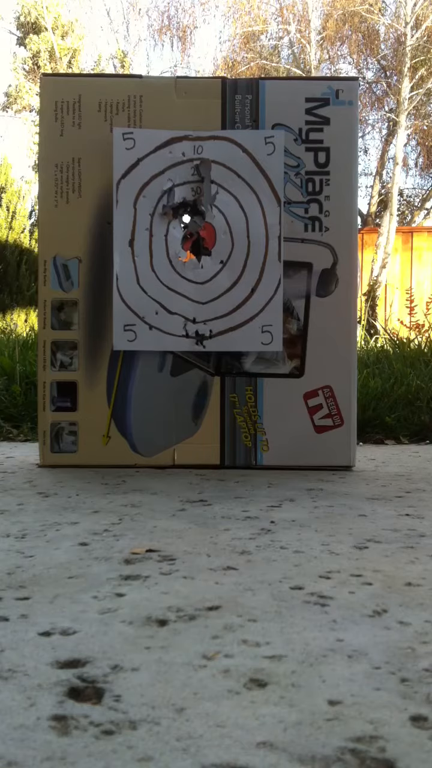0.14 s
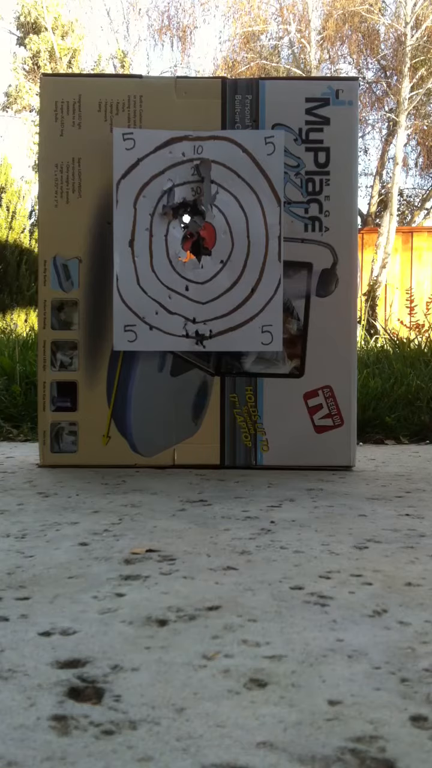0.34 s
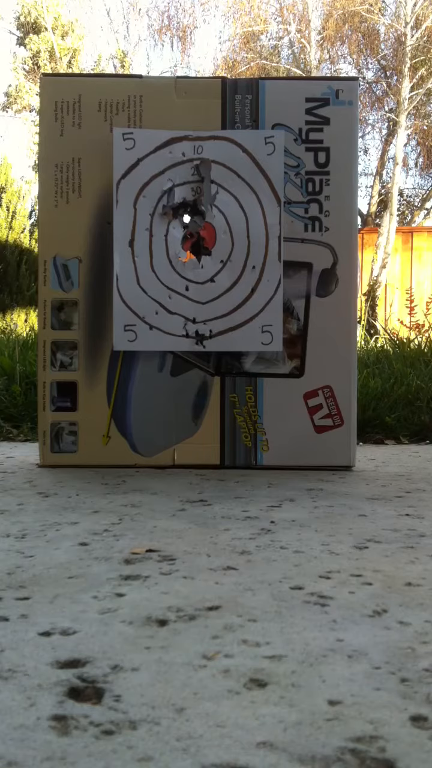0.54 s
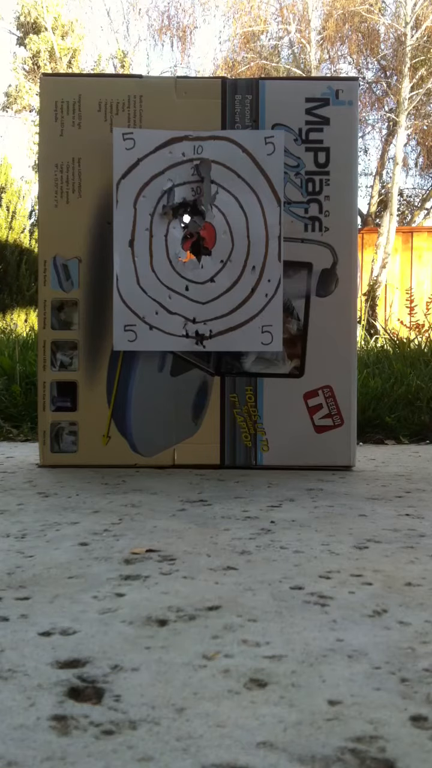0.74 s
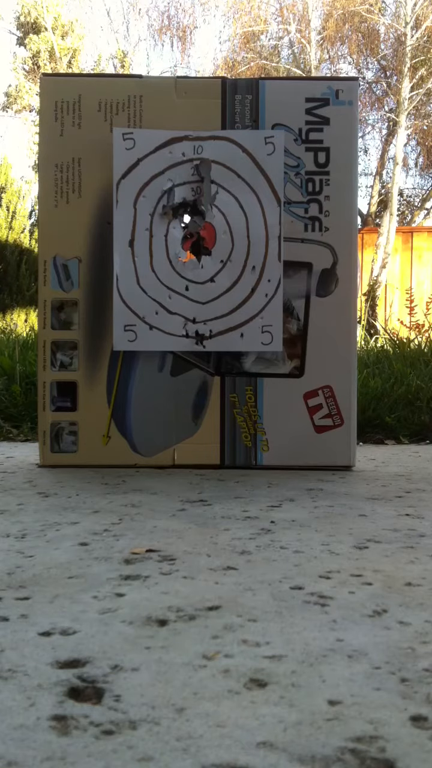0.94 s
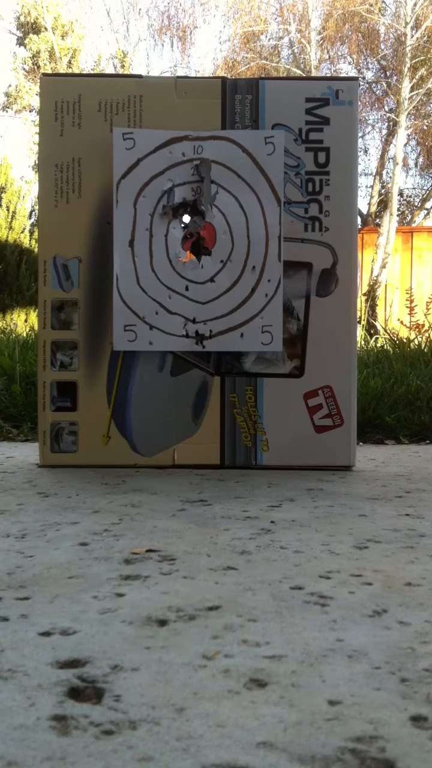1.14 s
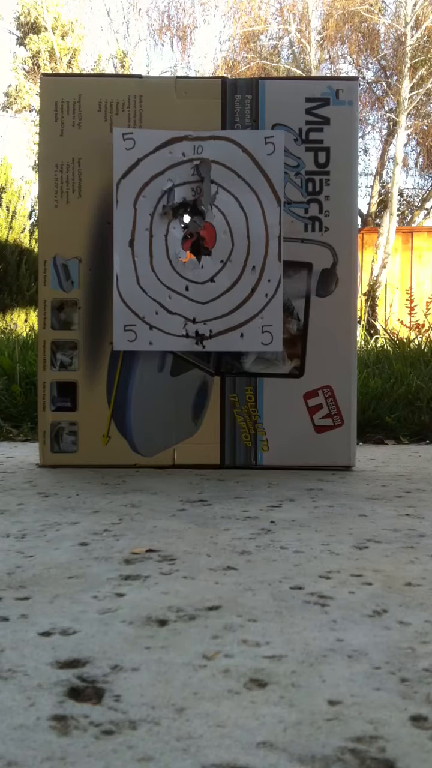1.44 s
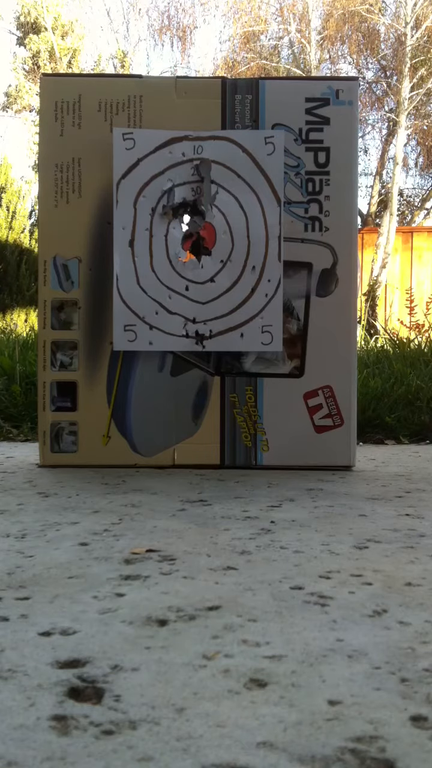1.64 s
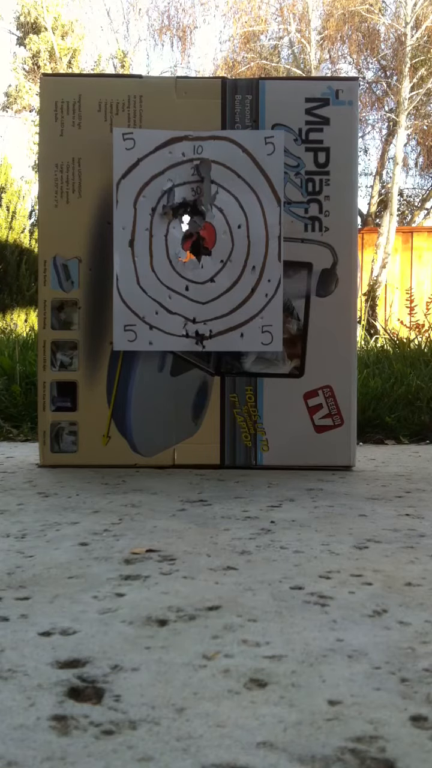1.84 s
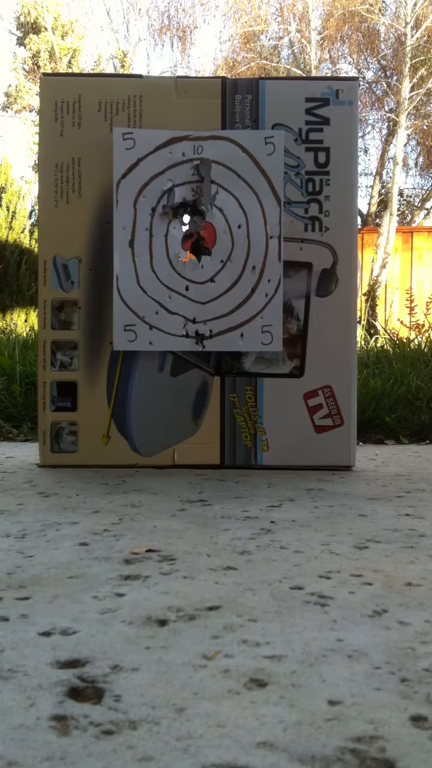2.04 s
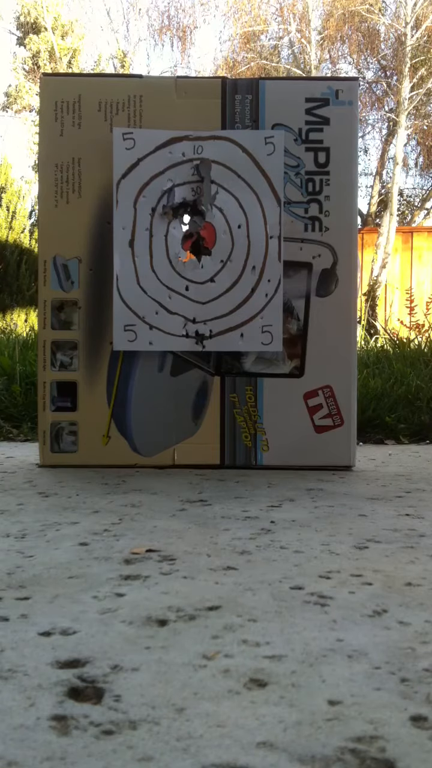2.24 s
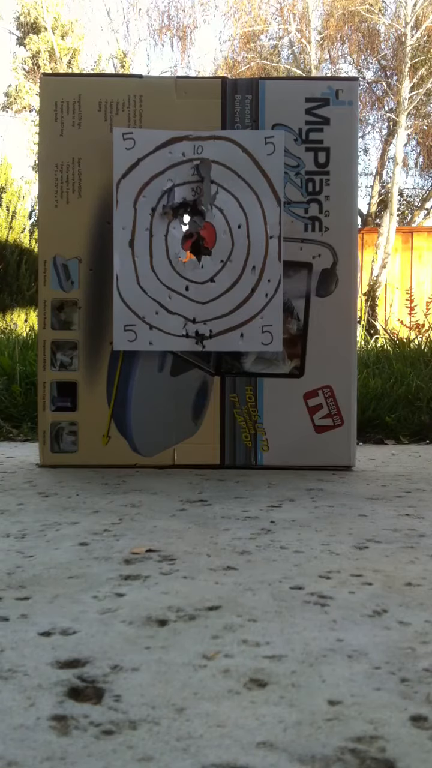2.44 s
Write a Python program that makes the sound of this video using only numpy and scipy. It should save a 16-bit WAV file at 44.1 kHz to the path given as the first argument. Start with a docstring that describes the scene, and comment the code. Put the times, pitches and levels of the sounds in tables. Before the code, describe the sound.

An electric airsoft gun fires one long, steady automatic burst, about twelve shots a second, with motor whine and gear rattle; pellets snap sharply on a cardboard box beside the microphone, then a short bright yard echo fades.

```python
"""In a yard, an electric airsoft gun fires one long automatic burst at a paper target on a cardboard box.
A wavering motor whine and noisy gear rattle run over faint outdoor noise. In each cycle a noise rush leads
to a cluster of metal contacts that set gun modes ringing, with a thump and one echo. About 18 ms later
the pellet cracks on the box beside the microphone: filtered snaps, noise crackle, ringing cardboard modes.
Decaying noise bands give the yard's short bright wash."""
import sys
import numpy as np
from scipy import signal
from scipy.fft import rfft, irfft
from scipy.io import wavfile

SR = 44100
rng = np.random.default_rng(int(sys.argv[2]) if len(sys.argv) > 2 else 0)


def bounce(signal):
    """Save signal as a 16-bit WAV file at the path given by the first command-line argument."""
    frames = np.transpose(np.atleast_2d(signal))
    limited = np.clip(frames, -1, 1)
    pcm = np.round(limited * 32767).astype(np.int16)
    wavfile.write(sys.argv[1], SR, pcm)


N = 112455


def from_db(db):
    """Turn decibels into amplitude gain."""
    return 10 ** (np.asarray(db, float) / 20)


def rms_one(x):
    """Scale a signal to an rms of 1."""
    return x / np.sqrt(np.mean(x ** 2) + 1e-20)


def noise():
    """White noise as long as the scene."""
    return rng.standard_normal(N)


def band(x, low_hz, high_hz):
    """Keep what lies between two frequencies."""
    sos = signal.butter(2, [low_hz, high_hz], "band", fs=SR, output="sos")
    return signal.sosfilt(sos, x)


def clicks(start_s, gains):
    """Place one impulse per event over a vanishingly small floor."""
    out = np.full(N, 1e-18)
    index = np.clip((np.asarray(start_s) * SR).astype(int), 0, N - 1)
    np.add.at(out, index, gains)
    return out


def ring(x, pitch_hz, t60_s):
    """A two-pole resonator: each click sets off a sine that falls 60 dB in t60_s."""
    radius = from_db(-60 / (t60_s * SR))
    angle = 2 * np.pi * pitch_hz / SR
    return signal.lfilter([0, np.sin(angle)], [1, -2 * radius * np.cos(angle), radius ** 2], x)


def power_decay(t60_s):
    """Per-sample factor by which power falls 60 dB in t60_s."""
    return from_db(-120 / (t60_s * SR))


def dying(start_s, level_db, t60_s):
    """Amplitude envelope of overlapping decays, summed as powers."""
    power = clicks(start_s, from_db(2 * level_db))
    return np.sqrt(signal.lfilter([1], [1, -power_decay(t60_s)], power))


def drift(rate_hz):
    """Smoothed random wander of rms 1, after one second of settling."""
    r = np.exp(-2 * np.pi * rate_hz / SR)
    wander = signal.lfilter([1], [1, -2 * r, r * r], rng.standard_normal(N + SR))
    return rms_one(wander[SR:])


# spectrum of the outdoor air: pitch_hz [Hz], level_db [dB per Hz, relative]
YARD_SPECTRUM = [(35, -45), (60, -20), (222, -2.5), (308, -9), (666, -13), (1060, -20.5), (1280, -17.5),
                 (16000, -35.5)]
YARD_DB = -69.5  # rms


def yard():
    """Faint outdoor air: noise shaped to a spectrum on a log-frequency scale."""
    pitch_hz, level_db = np.transpose(YARD_SPECTRUM)
    f = np.arange(N // 2 + 1) * SR / N + 1  # 1 Hz offset avoids log(0)
    shape = from_db(np.interp(np.log(f), np.log(pitch_hz), level_db))
    air = irfft(rfft(noise()) * shape, N)
    return from_db(YARD_DB) * rms_one(air)


# motor start: start_s [s], whine pitch_hz [Hz], whine level_db [dB rms, before flutter]
SPIN_UP = [(0.0, 765, -35.5), (0.014, 937, -40), (0.02, 936, -40), (0.034, 620, -52), (0.048, 637, -37)]
# gear rattle resonances: centre pitch_hz [Hz], width_hz [Hz], level_db [dB rms]
GEARS = [(671, 230, -47.5), (900, 1500, -51.5), (2330, 640, -53.5), (4130, 600, -51.5),
         (5430, 10400, -58.5)]
STEADY_S, WHINE_HZ, WHINE_DB = 0.07, 658, -51  # where the whine settles
WHINE_WAVER, WHINE_FLUTTER_DB = 0.036, 4.5  # rms pitch fraction, rms level
MOTOR_STOP_S, MOTOR_FADE_S = 2.27, 0.052  # the fade is an exponential time constant


def motor():
    """A sine whine that overshoots in pitch at the start, with gear rattle as resonant noise bands."""
    t = np.arange(N) / SR
    start_s, pitch_hz, level_db = np.transpose(list(SPIN_UP) + [(STEADY_S, WHINE_HZ, WHINE_DB)])
    # the waver begins at the last start-up point, before the whine settles
    waver = WHINE_WAVER * drift(24.2) * (t > start_s[-2])
    pitch = np.interp(t, start_s, pitch_hz) * (1 + waver)
    level = from_db(np.interp(t, start_s, level_db) + WHINE_FLUTTER_DB * drift(60))
    whine = np.sqrt(2) * level * np.sin(2 * np.pi * np.cumsum(pitch) / SR)
    gears = 0
    for centre_hz, width_hz, gear_db in GEARS:
        rattle = band(noise(), centre_hz - width_hz / 2, centre_hz + width_hz / 2)
        gears = gears + from_db(gear_db) * rms_one(rattle)
    fade = np.exp(-np.maximum(t - MOTOR_STOP_S, 0) / MOTOR_FADE_S)
    return (whine + gears) * fade


FAVOUR_DB_PER_OCTAVE, FAVOUR_MAX_DB = 6, 2.5  # modes far from the favoured pitch ring less


def struck(start_s, level_db, modes, spread_db, favoured_hz=None):
    """Modal ringing: every blow strikes every mode with a random strength of its own."""
    chance = rng.standard_normal((len(start_s), len(modes)))
    out = 0
    for k, (pitch_hz, mode_db, t60_s) in enumerate(modes):
        loss_db = 0
        if favoured_hz is not None:
            octaves_away = np.abs(np.log2(pitch_hz / favoured_hz))
            loss_db = np.minimum(FAVOUR_DB_PER_OCTAVE * octaves_away, FAVOUR_MAX_DB)
        blows = clicks(start_s, from_db(level_db + mode_db - loss_db + spread_db * chance[:, k]))
        out = out + (-1) ** k * ring(blows, pitch_hz, t60_s)  # neighbouring modes alternate in sign
    return out


THUMP_HZ, THUMP_T60_S, THUMP_SOFT_HZ, THUMP_GAIN_DB = 202.4, 0.017, 700, 12.5


def thump(start_s, level_db):
    """A low thump near 200 Hz: a softened click, randomly flipped, in a heavily damped resonance."""
    click = clicks(start_s, from_db(level_db + THUMP_GAIN_DB) * rng.choice([-1, 1], len(start_s)))
    r = np.exp(-2 * np.pi * THUMP_SOFT_HZ / SR)
    soft_click = signal.lfilter([1 - r], [1, -r], click)
    return ring(soft_click, THUMP_HZ, THUMP_T60_S)


# piston slams: start_s [s], ring_db, thump_db, treble tick_db [dB, before the gains]
SHOTS = [(0.054, -14.5, -33, -14), (0.1542, -16.5, -37, -16), (0.2405, -18, -33, -15),
         (0.3241, -19.5, -32, -19.5), (0.407, -18, -31, -17.5), (0.4892, -17, -28, -13.5),
         (0.5727, -18, -23, -14), (0.6555, -17.5, -41, -16.5), (0.7385, -19, -18, -21),
         (0.822, -17, -27, -21), (0.9057, -17, -20.5, -21.5), (0.989, -16.5, -23, -15.5),
         (1.072, -16, -33, -14.5), (1.1566, -15, -33, -10.5), (1.2401, -15.5, -29, -13.5),
         (1.324, -16, -27.5, -14), (1.408, -18.5, -24.5, -17.5), (1.4905, -18, -24, -15.5),
         (1.574, -18, -27, -14.5), (1.6581, -17, -26, -15), (1.742, -17, -28.5, -12),
         (1.8267, -18, -45, -15.5), (1.9105, -18, -18, -19), (1.9952, -18, -37.5, -18.5),
         (2.0789, -16.5, -22.5, -16.5), (2.163, -16, -27.5, -14.5), (2.2482, -16, -25, -15)]
# ringing modes of the gun body: pitch_hz [Hz], level_db [dB, relative], t60_s [s]
GUN_MODES = [(340, -8, 0.019), (667, -2.5, 0.011), (1567, -3.5, 0.0086), (2330, 2.5, 0.007),
             (2670, -4, 0.013), (3760, -8, 0.0056)]
# treble resonances heard in the tick, the highest probably the microphone's:
# pitch_hz [Hz], level_db [dB, relative], t60_s [s]
TICK_RESONANCES = [(6500, -18, .004), (9480, -2, 0.0013), (13900, 2, 0.002)]
# metal contacts of one slam: lag_s from its stated time [s], ring_db, tick_db [dB, relative]
CONTACTS = [(-.0036, -18, -15.5), (-.0022, -12.5, -21.5), (-.0012, -9.5, -18.5), (-.0004, 2, -1),
            (.0006, -14, -14.5)]
GUN_GAIN_DB, TICK_GAIN_DB = 1.5, 7.5
RUSH_S, RUSH_DB = 0.0032, -9.5  # air and rattle of the travelling piston, relative to the ring level
ECHO_S, ECHO_DB, ECHO_LOW_HZ = 0.0064, -10.5, 900


def piston():
    """A swelling noise rush, a run of contacts that ring and tick, one hard echo and a thump."""
    start_s, ring_db, thump_db, tick_db = np.transpose(SHOTS)
    ramp = np.linspace(.25, 1, int(RUSH_S * SR)) ** 2
    swell = signal.fftconvolve(clicks(start_s - RUSH_S, from_db(ring_db + RUSH_DB)), ramp)[:N]
    rush = swell * rms_one(band(noise(), 410, 5200) + .3 * noise())
    body = struck(start_s, ring_db + GUN_GAIN_DB, GUN_MODES, spread_db=2.0)
    tick = struck(start_s, tick_db + TICK_GAIN_DB, TICK_RESONANCES, spread_db=2.0)
    slam = 0
    for lag_s, body_db, treble_db in CONTACTS:
        contact = from_db(body_db) * body + from_db(treble_db) * tick
        slam = slam + np.roll(contact, int(lag_s * SR))
    echo = from_db(ECHO_DB) * np.roll(band(slam, ECHO_LOW_HZ, 18000), int(ECHO_S * SR))
    return rush + slam + echo + thump(start_s, thump_db)


# pellet strikes: start_s [s], box_db [dB], favoured box_hz [Hz], thump_db [dB],
# crack_db around 2, 5 and 12 kHz [dB], wash_db [dB]; all levels before the gains
HITS = [(0.0732, -30, 509, -38, -16, -32, -18, -31), (0.1737, -18, 565, -27, -16, -37, -21, -33),
        (0.2592, -20, 544, -25, -23, -20, -20.5, -30.5), (0.341, -39, 534, -27.5, -19, -29, -25, -30.5),
        (0.4255, -24, 820, -44, -31, -12.5, -34, -33.5), (0.5079, -21, 640, -23.5, -45, -12.5, -28, -32),
        (0.5912, -24, 686, -37, -22, -17.5, -21, -31.5), (0.6739, -30.5, 569, -25, -43, -11.5, -19, -36),
        (0.7573, -22, 488, -18.5, -42, -29, -14, -32), (0.8403, -16, 610, -21.5, -34, -18, -15.5, -35),
        (0.9224, -21, 539, -29, -20, -13, -30, -31), (1.0076, -21.5, 571, -27, -30, -24, -13, -32),
        (1.09, -17, 557, -45, -34, -19, -20, -31), (1.173, -26, 642, -37, -25, -27, -25, -30.5),
        (1.2577, -19, 710, -24, -24, -28, -16, -29.5), (1.3408, -19.5, 528, -38, -30, -17, -19, -30.5),
        (1.4251, -21, 540, -27, -20, -22, -22, -31.5), (1.5082, -19, 640, -23, -23.5, -25.5, -21, -33),
        (1.5927, -31.5, 590, -23, -45, -10, -16, -33), (1.677, -18, 515, -51.5, -31, -19, -23, -29.5),
        (1.7603, -40, 647, -42, -36, -32, -25.5, -38.5), (1.8444, -22, 669, -27, -40, -17.5, -19, -30),
        (1.9295, -19.5, 576, -39, -32, -10, -33, -33.5), (2.0132, -24, 665, -38, -19.5, -17.5, -16.5, -31),
        (2.0971, -22.5, 533, -43, -19.5, -17, -19.5, -30.5),
        (2.1815, -19, 770, -28, -26, -18.5, -21, -29.5), (2.2658, -19.5, 685, -33, -27, -17, -21, -31)]
# ringing modes of the cardboard box: pitch_hz [Hz], level_db [dB, relative], t60_s [s]
BOX_MODES = [(332, -7, 0.017), (416, -2, 0.038), (508, -0.5, 0.045), (607, -3, .03), (692, -5.5, 0.023),
             (848, 1, 0.029), (1005, -4, 0.025), (1253, -10, .02), (2390, -1, 0.028), (4450, -8, .025)]
# edges of the three crack bands: low_hz [Hz], high_hz [Hz]
CRACK_BANDS = [(1400, 2640), (3200, 6600), (8000, 14200)]
# crackle decay in each crack band: t60_s [s]
CRACK_DECAYS = [0.012, 0.0062, 0.007]
# crackle trim in each crack band: gain_db [dB]
CRACK_GAINS = [4.5, 2.5, 4.5]
# trim of the first contact in each crack band: gain_db [dB]
SNAP_GAINS = [19, 15.5, 7.5]
BOX_GAIN_DB, KNOCK_GAIN_DB = -1.5, 25.5  # the knock is the first contact in the low middle


def pellets():
    """A click knocks and snaps through filters, noise crackles, the cardboard rings and thumps."""
    hit_s, box_db, box_hz, thump_db, *crack_db, _ = np.transpose(HITS)
    start_s = hit_s - .0004
    sign = rng.choice([-1, 1], len(hit_s))
    crack = band(clicks(start_s, sign * from_db(box_db + KNOCK_GAIN_DB)), 350, 1400)
    settings = zip(crack_db, SNAP_GAINS, CRACK_GAINS, CRACK_DECAYS, CRACK_BANDS)
    for level_db, snap_db, gain_db, t60_s, edges_hz in settings:
        snap = band(clicks(start_s, sign * from_db(level_db + snap_db)), *edges_hz)
        crackle = dying(start_s, level_db + gain_db, t60_s) * rms_one(band(noise(), *edges_hz))
        crack = crack + snap + crackle
    box = struck(start_s, box_db + BOX_GAIN_DB, BOX_MODES, spread_db=3.5, favoured_hz=box_hz)
    return crack + box + thump(start_s, thump_db)


# wash by band: centre pitch_hz [Hz], level_db [dB], t60_s [s], late_db [dB], late_t60_s [s],
# slam_db after a slam [dB]; all levels relative
WASH_BANDS = [(150, -19, 0.047, -47, 0.27, -11.5), (306, -5.5, 0.058, -30.5, 0.3, -4),
              (590, -4.5, 0.079, -26.5, 0.41, -5.5), (1110, -9.5, .12, -41.5, .4, -7),
              (2260, -8, 0.16, -25.5, 0.38, -1), (4630, -7.5, .13, -16, 0.22, -14.5),
              (8350, -11.5, 0.17, -26.5, 0.26, -11), (14000, -3.5, 0.097, -25.5, 0.23, -5.5)]
SLAM_WASH_T60_S, SLAM_WASH_DB = 0.053, -7.5
SLAP_S, SLAP_SPREAD_S, SLAP_DB, SLAP_LOW_HZ = 0.01, 0.0014, -4.5, 3000  # treble swells as near walls answer
WASH_GRAIN_DB, WASH_GRAIN_HZ = 3, 290  # random level flicker


def wash():
    """The yard's answer: grainy noise that dies band by band after each strike and slam."""
    hit_s, hit_db = np.array(HITS)[:, 0], np.array(HITS)[:, -1]
    slam_s, ring_db = np.array(SHOTS)[:, 0], np.array(SHOTS)[:, 1]
    centres = np.array(WASH_BANDS)[:, 0]
    edges = np.r_[centres[0] / 2, np.sqrt(centres[1:] * centres[:-1]), 18000]
    bump = signal.windows.gaussian(int(6 * SLAP_SPREAD_S * SR), SLAP_SPREAD_S * SR / 2)
    bump = bump / bump.sum()
    out = 0
    for row, low_hz, high_hz in zip(WASH_BANDS, edges, edges[1:]):
        pitch_hz, level_db, t60_s, late_db, late_t60_s, slam_db = row
        early = dying(hit_s, hit_db + level_db + 7, t60_s)
        late = dying(hit_s, hit_db + late_db + 11.5, late_t60_s)
        after_slam = dying(slam_s, ring_db + SLAM_WASH_DB + slam_db, SLAM_WASH_T60_S)
        power = early ** 2 + late ** 2 + after_slam ** 2
        if pitch_hz > SLAP_LOW_HZ:
            slap = clicks(hit_s + SLAP_S, from_db(2 * (hit_db + level_db + SLAP_DB)))
            swell = signal.fftconvolve(slap, bump, "same")
            # 16 on the amplitude scale is 8 dB of power
            power = power + np.abs(signal.lfilter([from_db(16)], [1, -power_decay(t60_s)], swell))
        grain = from_db(WASH_GRAIN_DB * drift(WASH_GRAIN_HZ))
        out = out + np.sqrt(power) * grain * rms_one(band(noise(), low_hz, high_hz))
    return out


def scene():
    """Sum all sources into one channel."""
    return (yard() + motor() + piston() + pellets() + wash())[None]


MIC_LOW_HZ, CUTOFF_HZ, CEILING = 111, 16900, 1


def record(dry):
    """The microphone drops the bass, peaks are rounded by tanh and the top is cut steeply."""
    bass_cut = signal.butter(3, MIC_LOW_HZ, "high", fs=SR, output="sos")
    top_cut = signal.cheby2(12, 50, CUTOFF_HZ, fs=SR, output="sos")  # 50 dB down at the cutoff
    x = signal.sosfilt(bass_cut, dry)
    rounded = CEILING * np.tanh(x / CEILING)
    return signal.sosfilt(top_cut, rounded)


dry = scene()
out = record(dry)
bounce(out)
```